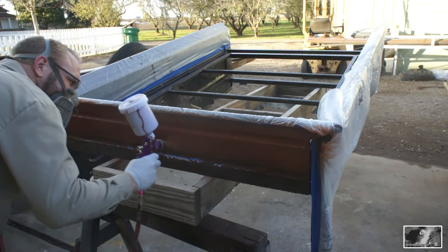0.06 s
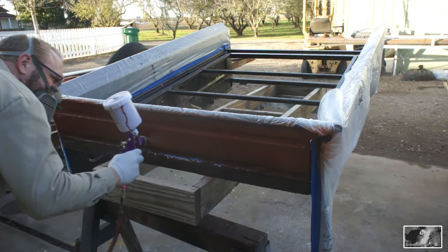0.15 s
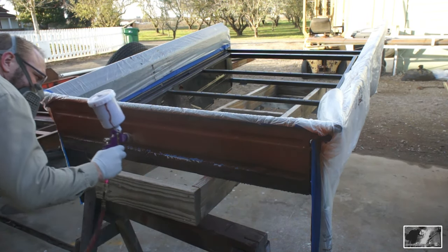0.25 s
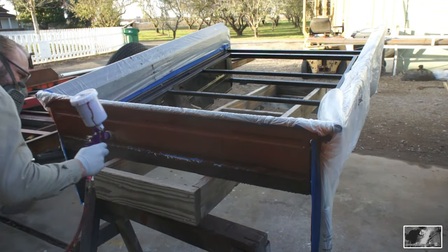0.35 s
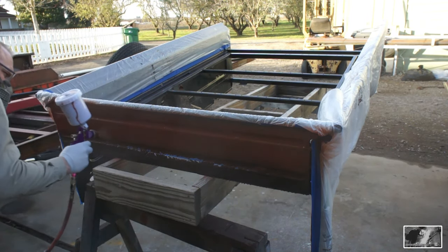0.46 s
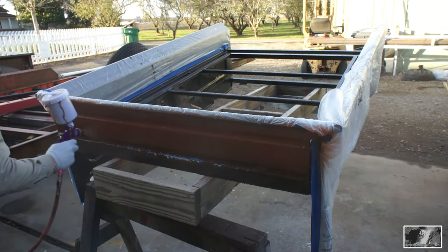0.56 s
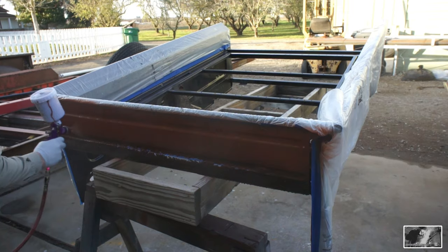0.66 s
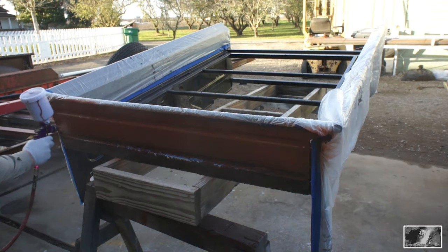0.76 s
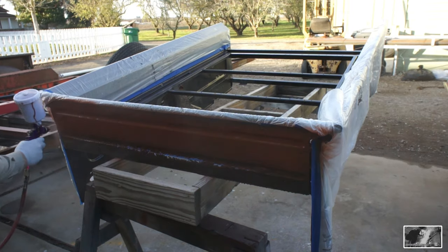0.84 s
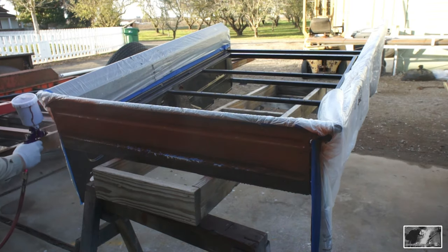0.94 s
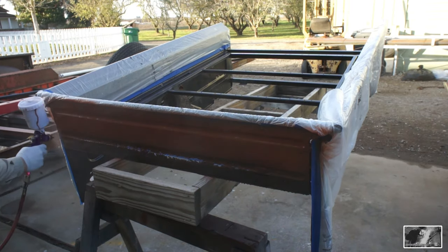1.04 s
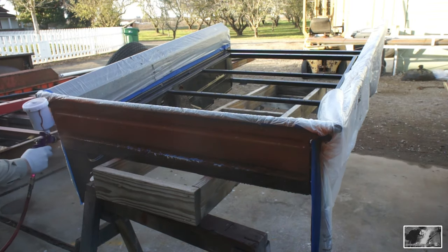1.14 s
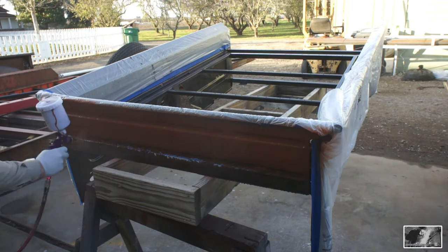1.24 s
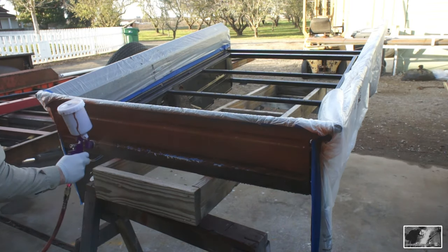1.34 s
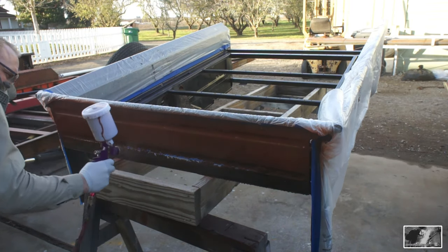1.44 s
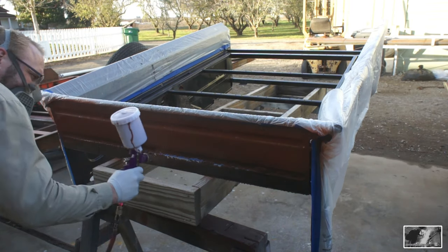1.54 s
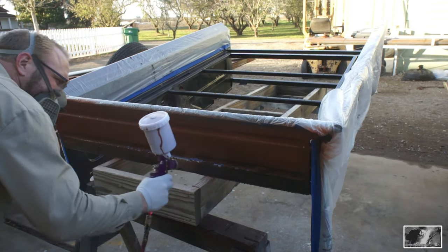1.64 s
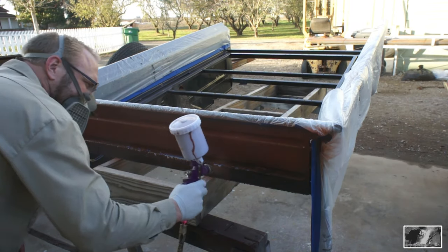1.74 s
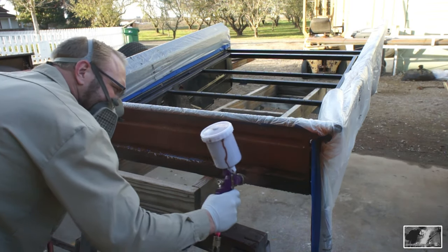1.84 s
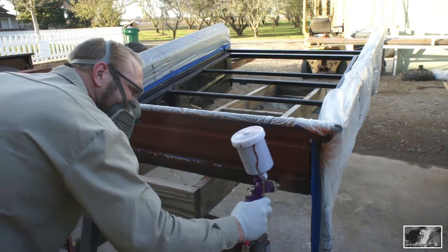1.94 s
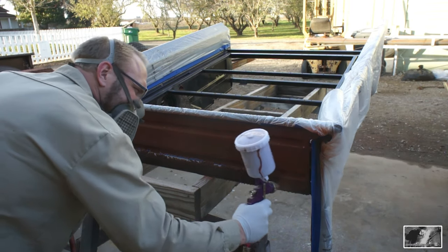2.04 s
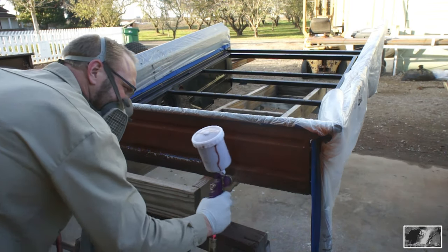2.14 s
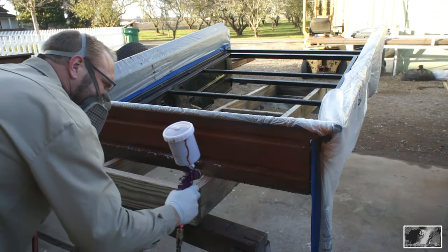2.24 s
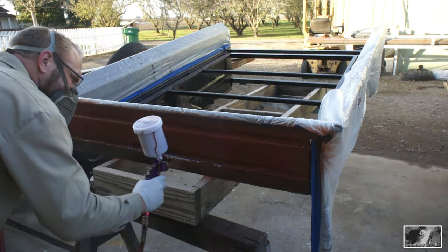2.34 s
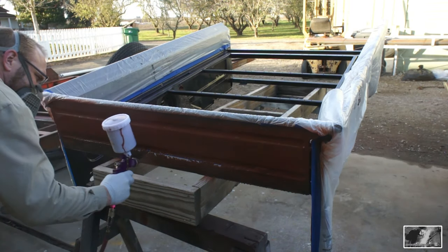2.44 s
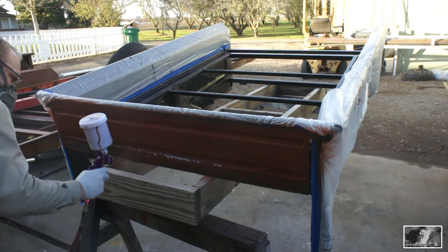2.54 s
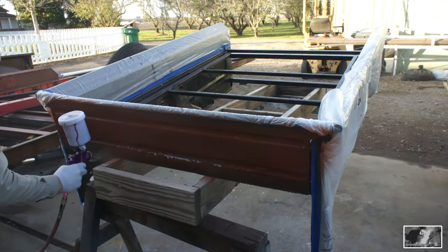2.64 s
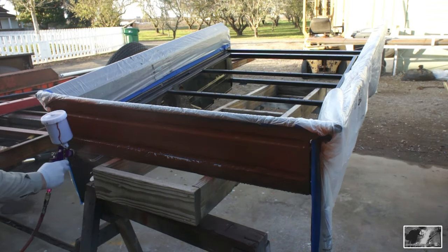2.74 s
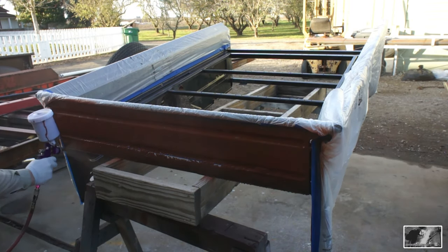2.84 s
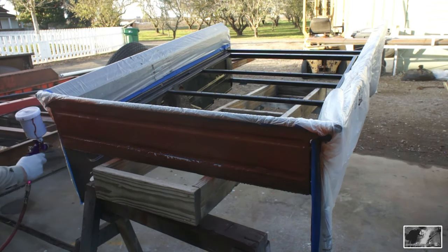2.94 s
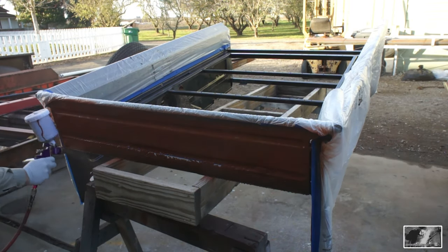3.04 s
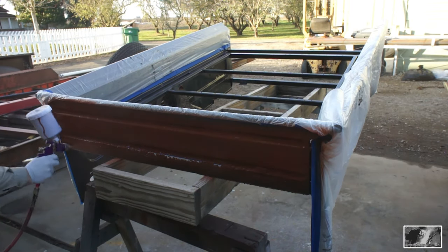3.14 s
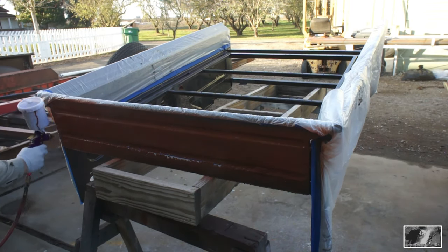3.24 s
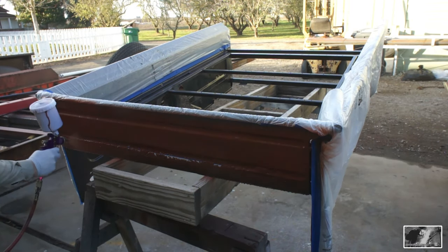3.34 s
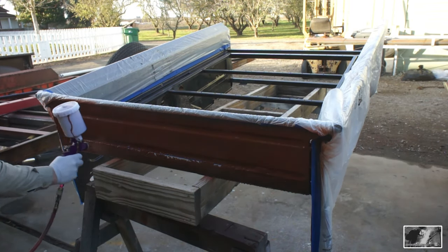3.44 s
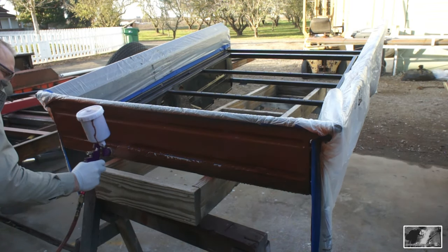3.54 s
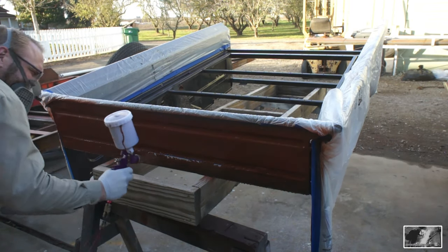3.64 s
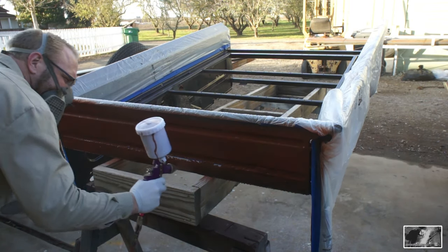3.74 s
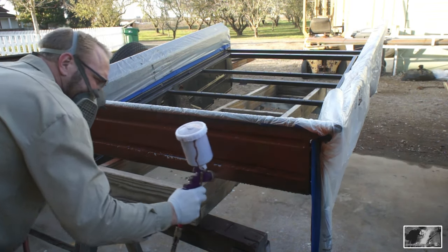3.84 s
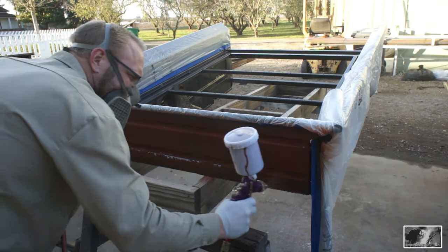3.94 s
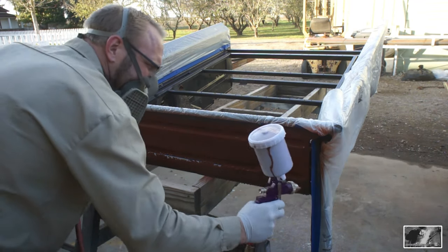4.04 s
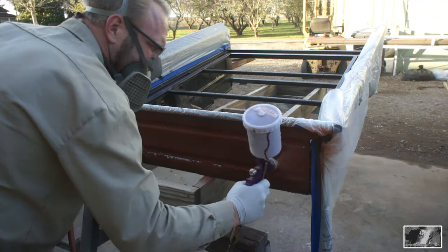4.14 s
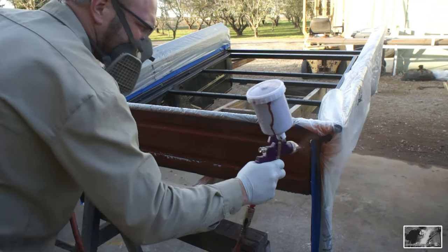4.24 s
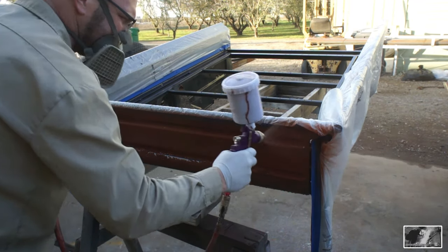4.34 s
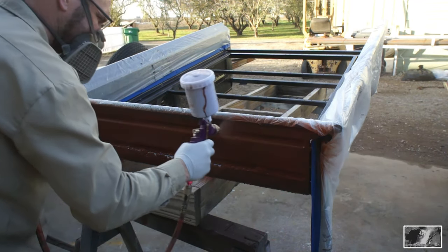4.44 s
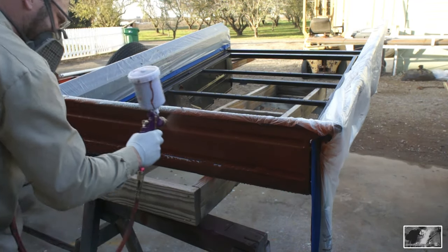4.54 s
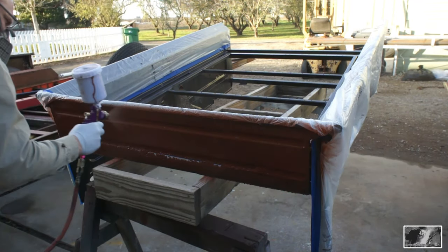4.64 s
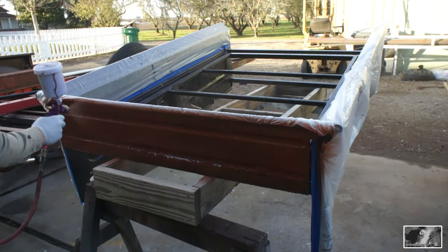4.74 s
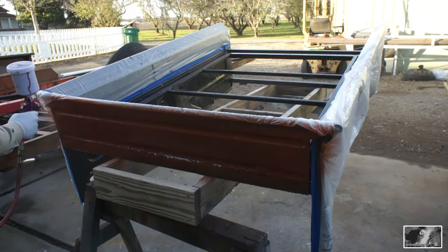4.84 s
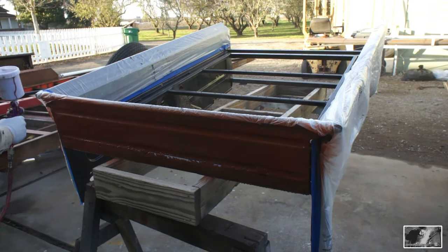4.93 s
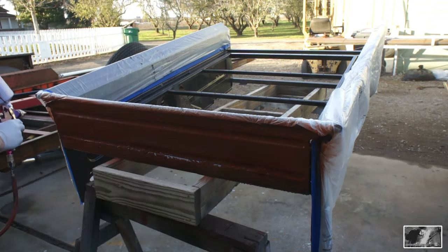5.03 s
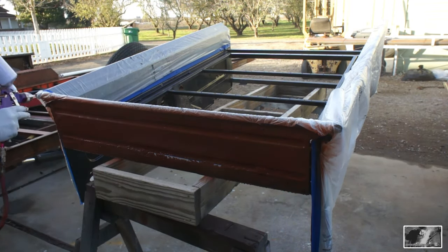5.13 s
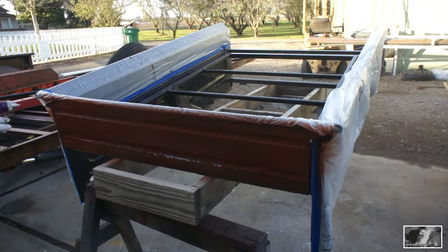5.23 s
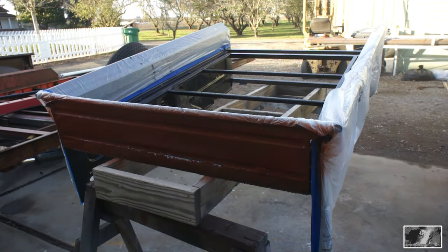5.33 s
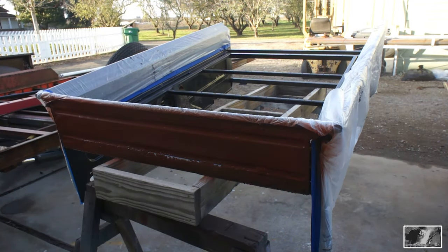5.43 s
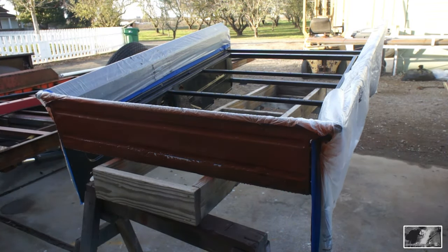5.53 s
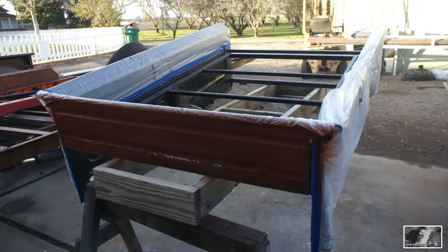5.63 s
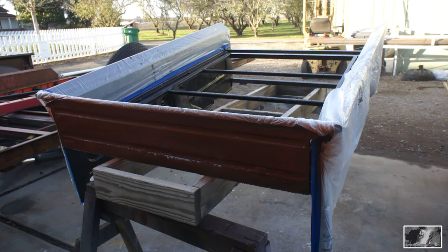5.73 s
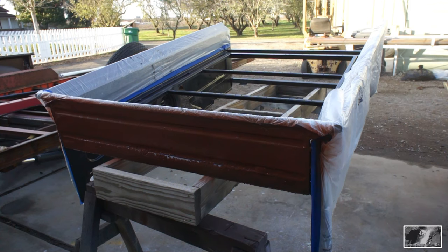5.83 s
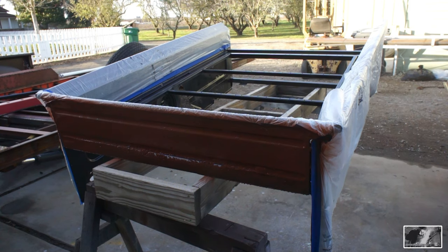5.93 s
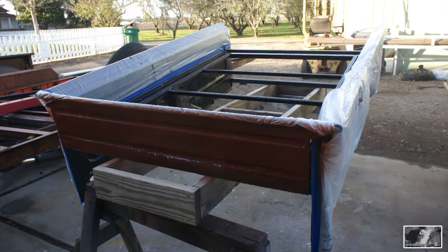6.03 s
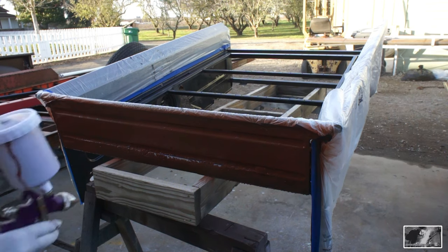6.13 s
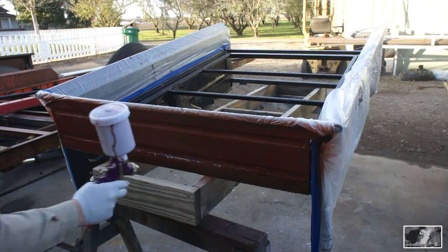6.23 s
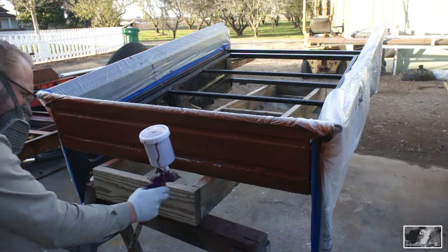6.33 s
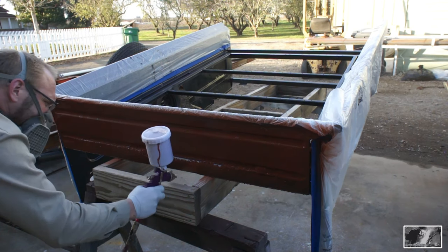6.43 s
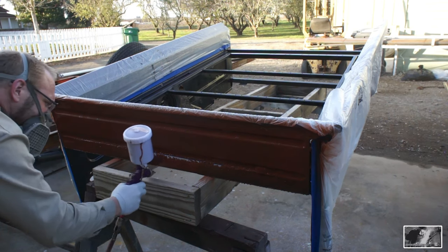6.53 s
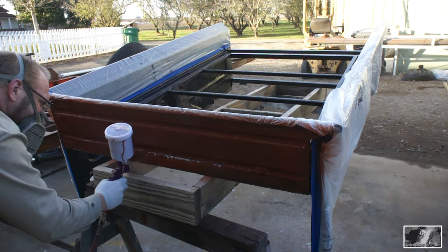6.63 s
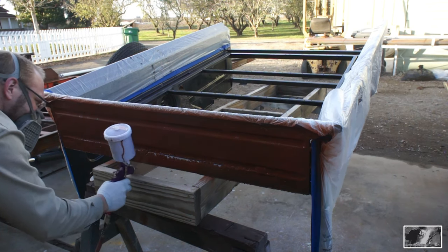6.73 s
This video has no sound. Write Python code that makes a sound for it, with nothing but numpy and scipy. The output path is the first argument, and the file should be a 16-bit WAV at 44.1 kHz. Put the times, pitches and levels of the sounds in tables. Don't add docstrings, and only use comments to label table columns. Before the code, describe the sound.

Outdoors, a spray gun blows close to a metal panel with a full, slightly dull roar. The sound abruptly changes to a brighter, thinner hiss sweeping gently side to side, with a piston compressor chugging rapidly behind. Shoes scrape gritty concrete. The hiss cuts off, leaving the compressor, a small hard clack and cloth rustle, then bursts back. Close stereo microphone.

```python
import sys
import numpy as np
from scipy import signal
from scipy.io import wavfile
from scipy.ndimage import map_coordinates

SR = 44100
rng = np.random.default_rng(int(sys.argv[2]) if len(sys.argv) > 2 else 0)


def natural_amplitude(level_db):
    exponent = np.asarray(level_db, float) / 20
    return 10 ** exponent


def unload_wav(signal):
    wavfile.write(
        sys.argv[1],
        SR,
        np.round(np.clip(np.atleast_2d(signal).T, -1, 1) * 32767).astype(np.int16),
    )


N = 298998
T = np.arange(N) / SR

# open_s, rise_s, shut_s, fall_s
PULLS = [
    (1.1, .01, 5.015, 0.0044),
    (6.372, 0.013, 6.9, .01),
]
# frequency_hz, correlation (-1 to 1)
GUN_LIKENESS = [(60, 0.48), (130, 0.72), (300, 0.98), (700, 0.85), (1500, 0.99), (4000, 0.74), (8000, 0.71),
                (15000, 0.55)]


def rms_one(x):
    return x / np.sqrt(np.mean(x ** 2) + 1e-20)


def in_time(tables):
    s, *columns = np.concatenate(tables).T
    return [np.interp(T, s, c) for c in columns]


def at_hz(points, hz):
    points_hz, values = np.array(points).T
    return np.interp(np.log(hz), np.log(points_hz), values)


def drift(rate, size=N):
    r = np.exp(-80 * np.pi * rate / SR)
    white = rng.standard_normal(N // 40 + 2002)
    slow = signal.lfilter([1], [1, -2 * r, r * r], white)[2000:]
    return np.interp(np.arange(size) / 40, np.arange(len(slow)), rms_one(slow))


def ring(clicks, hz, t60):
    r, w = natural_amplitude(-60 / (t60 * SR)), 2 * np.pi * hz / SR
    return signal.lfilter([0, np.sin(w)], [1, -2 * r * np.cos(w), r * r], clicks + 1e-18)


def shaken(modes):
    out = 0
    for hz, width, db in modes:
        out = out + natural_amplitude(db) * rms_one(ring(rng.standard_normal(N), hz, 2.2 / width))
    return out


def bell(s, width):
    return np.exp(-.5 * ((T - s) / (width / 2)) ** 2)


def humps(rows):
    return sum(natural_amplitude(db) * bell(s, width) for s, width, db in rows)


def octave_bump(hz, centre_hz, octaves):
    return np.exp(-.5 * (np.log2(hz / centre_hz) / octaves) ** 2)


def bands(spectrum, alike, span, patchy_db, grit_db=0, moving=None):
    a, b = (int(np.clip(s * SR, 0, N)) for s in span)
    low, top = spectrum[0][0], min(spectrum[-1][0], .45 * SR)
    per_octave = 5 if top > 15000 else 3
    edges = np.geomspace(low, top, int(per_octave * np.log2(top / low)) + 2)
    grains = natural_amplitude(grit_db * np.minimum(rng.exponential(1, b - a), 5))
    white = rng.standard_normal((2, 2, b - a)) * grains
    out, power, together = np.zeros((2, N)), 0, drift(11.6, size=b - a)
    for k, (lo, hi) in enumerate(zip(edges, edges[1:])):
        band = signal.butter(2, [lo, hi], "band", fs=SR, output="sos")
        mid, side = signal.sosfilt(band, rms_one(white[k % 2]))
        hz = np.sqrt(lo * hi)
        c = np.clip(at_hz(alike, hz), -1, 1)
        power += natural_amplitude(2 * at_hz(spectrum, hz)) * (hi - lo) / (SR / 2)
        db = at_hz(spectrum, hz) + patchy_db * (0.74 * together + drift(27, size=b - a))
        if moving:
            db = db + moving(hz)[a:b]
        gain = np.repeat(natural_amplitude(db[::16]), 16)[:b - a]
        out[:, a:b] += gain * (np.sqrt((1 + c) / 2) * mid + np.sqrt((1 - c) / 2) * side * [[1], [-1]])
    return out if moving else out / np.sqrt(power)


def gun_lead():
    # time_s, lead_us
    sweep = [(0.1, 4), (0.7, 50), (1.1, 52), (1.3, 19.5), (2.1, -17), (2.7, 20), (3.3, 27.5), (4.1, -22),
             (5.0, 34), (5.3, 26), (5.7, 50), (6.3, 36), (6.5, -5), (6.7, 10)]
    return in_time([sweep])[0]


def placed(x, pan_db):
    lead, at, right = gun_lead(), np.flatnonzero(x[1]), np.zeros(N)
    right[at] = map_coordinates(x[1], [at - lead[at] * 1e-6 * SR], order=3, mode="nearest")
    return np.array([x[0], right]) * natural_amplitude(pan_db / 2 * np.array([[1], [-1]]))


def yard():
    # frequency_hz, density_db (per Hz)
    air_colour = [(15, -59), (25, -32), (210, -23.5), (243, -17.5), (275, -12), (383, -13), (471, -18),
                  (522, -10), (579, -10.5), (616, -9.5), (951, -8.5), (1100, -8), (1320, -16), (2090, -10),
                  (3500, -50), (4550, -64), (7700, -120)]
    # frequency_hz, correlation
    air_likeness = [(60, -0.79), (180, -0.027), (550, 0.86), (1650, 0.94), (4970, 0.63), (15000, -0.44)]
    throb, breeze = np.cos(2 * np.pi * (18.13 * T - .04)), drift(4.7)

    def breathing(hz):
        return 0.98 * throb if hz > 900 else 7.1 * breeze * (hz < 220)
    shape = bands(air_colour, air_likeness, (1.1, 7), patchy_db=1.0, moving=breathing)
    return natural_amplitude(-39) * shape / shape[:, 2 * SR:].std()


def compressor():
    turn_hz = 18.13
    # phase (share of a turn), low_db, high_db
    knocks = [
        (.02, -5.5, -3.5),
        (.18, -6, -1),
        (.4, -13.5, -22.5),
        (.7, -2.5, -5),
        (.9, -5.5, -8),
    ]
    # frequency_hz, level_db, t60_s
    housing = [(366, -41, 0.061), (660, -40, .025), (960, -45.5, 0.033), (1416, -41, 0.041),
               (1843, -36.5, 0.046), (2159, -39.5, 0.067), (2580, -53, 0.034)]
    # frequency_hz, width_hz, level_db (rms)
    rattle = [(1117, 25, -48.5), (470, 50, -54.5), (858, 30, -62.5), (1033, 17, -58.5)]
    # multiple, level_db (rms)
    hum = [(21, -59), (28, -55), (29, -54), (30, -54), (35, -58), (38, -58), (43, -56), (46, -54),
           (48, -56), (56, -57), (58, -53), (61, -50), (62, -49), (63, -52)]
    turns = np.arange(int(turn_hz * N / SR) + 1)
    low, high = np.zeros((2, N + SR))
    for share, low_db, high_db in knocks:
        seconds = (turns + share % 1) / turn_hz
        at = (seconds * SR + rng.normal(0, 5, len(turns))).astype(int) % (N + SR)
        low[at] += natural_amplitude(low_db + rng.normal(0, 2.5, len(turns)))
        high[at] += natural_amplitude(high_db + rng.normal(0, 3.5, len(turns)))
    body = shaken(rattle)
    for k, (hz, db, t60) in enumerate(housing):
        clicks = low if hz < 1300 else high
        body += natural_amplitude(db) * ring(clicks[:N], hz, t60) * (-1) ** k
    wall = natural_amplitude(-17) * np.array([np.roll(body, 310), -np.roll(body, 397)])
    out = np.array([body, np.roll(body, 1)]) + wall
    for k, db in hum:
        phase = 2 * np.pi * (round(k) * turn_hz * T + rng.random())
        phase = phase + rng.normal(0, 0.11, (2, 1)) + 0.44 * drift(2.8)
        out += np.sqrt(2) * natural_amplitude(db + 2.8 * drift(5.5)) * np.sin(phase)
    return out


def gusts():
    # time_s, width_s, level_db
    puff_times = [(1.32, 0.026, -41), (1.35, 0.01, -31.5), (1.385, 0.031, -35), (2.03, 0.068, -44.5),
                  (4.09, 0.016, -40), (4.45, 0.041, -44), (4.75, 0.037, -43), (5.87, 0.039, -40)]
    puff_colour = [(120, -11), (200, -1), (400, 2.5), (600, -1), (900, -13)]
    lumps = bands(puff_colour, [(120, -.6), (900, -.6)], (1.2, 6), patchy_db=2.0, grit_db=3.5)
    return humps(puff_times) * lumps


def idle():
    # frequency_hz, density_db (per Hz)
    hiss_colour = [(2000, 1), (2800, 0.5), (3500, -2), (5000, -6.5), (7200, -5), (10500, -8.5), (13300, -9),
                   (15500, -8), (19000, -17)]
    # time_s, width_s, level_db
    rustles = [(5.72, 0.0095, -53), (5.822, 0.0082, -35.5), (5.87, .02, -43), (5.963, 0.016, -37),
               (5.985, 0.015, -42), (6.002, 0.023, -39), (6.022, 0.01, -41)]
    fading = natural_amplitude(-42 - 0.5 * (T - PULLS[0][2]))
    hiss = fading * bands(hiss_colour, [(3000, 0.47), (15000, 0.75)], (4.9, 6.5), patchy_db=1.1)
    cloth_colour = [(2800, -8), (3700, 0.1), (6000, -6), (9000, -7), (16000, -10)]
    cloth = bands(cloth_colour, GUN_LIKENESS, (5.6, 6.1), patchy_db=3.3, grit_db=-2.0)
    return placed(hiss + humps(rustles) * cloth, pan_db=1.5)


def scuffs():
    # start_s, length_s, level_db, swell_db_per_s, hollow_db
    drags = [
        (2.235, 0.28, -31.5, -5, 0.5),
        (3.554, .25, -34.5, 19, 3.5),
    ]
    # time_s, width_s, level_db
    catches = [(2.21, .02, -32.5), (2.266, 0.025, -30), (2.332, 0.023, -28), (2.44, .04, -37),
               (2.48, 0.016, -35), (2.55, .02, -33), (2.98, 0.054, -35), (3.615, 0.014, -34),
               (3.71, 0.044, -37), (3.795, 0.027, -33), (3.851, 0.024, -23.5)]
    # frequency_hz, density_db (per Hz)
    grit_colour = [(290, -29), (500, -20), (566, -20), (635, -13), (993, -13.5), (1410, -4), (1540, -8),
                   (1890, -6.5), (2510, -10.5), (4300, -14), (6200, -19), (13200, -120)]
    attack_s, release_s = .015, 0.022
    level, hollow = humps(catches), np.zeros(N)
    for s, length, db, swell_db, hollow_db in drags:
        shape = np.clip((T - s) / attack_s, 0, 1) * np.exp(-np.maximum(T - s - length, 0) / release_s)
        level = level + shape * natural_amplitude(db + swell_db * np.clip(T - s, 0, length))
        hollow[T > s] = hollow_db
    centred = [(500, 1.0), (6000, 0.94)]
    grit = bands(grit_colour, centred, (2.1, 4), patchy_db=.7, grit_db=1.5,
                 moving=lambda hz: hollow * octave_bump(hz, 1930, .15))
    return level * grit / grit[:, int(2.2 * SR):3 * SR].std()


def clack():
    # start_s, level_db, pitch_hz, t60_s
    struck = [(5.6219, -22, 695, .006), (5.6223, -20, 2400, 0.0056), (5.6225, -22, 4070, 0.0093),
              (5.6235, -29, 9700, .012), (5.6297, -18, 800, 0.0088), (5.6298, -10, 1330, 0.0032),
              (5.630, -19, 5600, 0.0033), (5.638, -25, 1200, .006)]
    cracks = [(5.6228, 0.0022, -27), (5.6255, 0.0052, -34), (5.6305, 0.0038, -33)]
    out = humps(cracks) * rng.standard_normal(N)
    for s, db, hz, t60 in struck:
        out -= natural_amplitude(db) * ring(np.arange(N) == round(s * SR), hz, t60)
    out = signal.sosfilt(signal.butter(2, [420, 11000], "band", fs=SR, output="sos"), out)
    return np.array([out, natural_amplitude(0.5) * np.roll(out, 1)])


def roar():
    # time_s, level_db, boom_db (near 700 Hz)
    drumming = [(0.0, -32.5, -5.5), (0.38, -33.5, -8), (0.5, -33, -10.5), (0.8, -34, -12),
                (0.96, -35, -2.5), (1.17, -33.5, -9.5)]
    # frequency_hz, density_db (per Hz)
    drum_colour = [(24, -49), (40, -23), (155, -9), (184, -7.5), (335, -5.5), (384, -5), (531, -8),
                   (736, -6), (968, -12), (1050, -16), (1360, -12.5), (2090, -15), (2400, -14.5),
                   (3120, -39), (5280, -120)]
    # frequency_hz, width_hz, level_db
    panel = [(190, 46, -46.5), (383.4, 7.5, -45), (730, 50, -48)]
    level, boom = in_time([drumming])
    swing = boom - np.mean(np.array(drumming)[:, 2])
    shape = bands(drum_colour, GUN_LIKENESS, (0, 1.2), patchy_db=.5,
                  moving=lambda hz: swing * np.exp(-np.log(hz / 700) ** 2 / 0.24))
    rings = shaken(panel) * (T < 1.2)
    return placed(natural_amplitude(level) * shape / shape[:, :SR].std() + rings, pan_db=0.5)


def splash():
    # time_s, level_db
    strikes = [
        [(1.17, -41), (1.4, -43), (1.75, -31.5), (1.87, -44), (2.6, -39), (3.5, -48), (4.05, -38), (4.6, -43),
         (5.01, -48)],
        [(6.385, -27.5), (6.48, -30.5), (6.53, -28), (6.57, -32), (6.78, -33.5)],
    ]
    # frequency_hz, density_db (per Hz)
    strike_colour = [(300, -37), (450, -28), (640, -7.5), (800, -13), (1150, -4), (1450, -4), (2000, -5),
                     (2500, -8), (3200, -13.5), (4200, -37)]
    body = -1 + .15 * gun_lead()
    shape = bands(strike_colour, GUN_LIKENESS, (1.1, 7), patchy_db=1.1, grit_db=2.5,
                  moving=lambda hz: body * np.exp(-np.log(hz / 750) ** 2 / 0.15))
    return natural_amplitude(in_time(strikes)[0]) * shape / shape[:, 2 * SR:].std()


def jet(tables, side_on, cap, span, pan_db):
    # time_s, width_s, level_db
    off_edge = [(1.26, 0.14, -3), (2.03, 0.093, -2.5), (3.3, 0.26, -3), (4.1, 0.11, -3), (4.23, .06, -1)]
    jet_band_hz, pivot_hz = 10500, 8000
    beaming = 1.5
    level, facing = in_time(tables)
    missed = sum(db * bell(s, width) for s, width, db in off_edge)

    def colour(hz):
        beam = ((hz / pivot_hz) ** beaming - 1) / (beaming * np.log(2))
        scatter = octave_bump(hz, 8260, 0.5)
        density = level + 10 * np.log10(SR / 2 / jet_band_hz)
        return density + at_hz(side_on, hz) + facing * beam + missed * scatter
    noise = bands(cap, GUN_LIKENESS, span, patchy_db=0.8, grit_db=2.0, moving=colour)
    return placed(noise, pan_db)


def close_jet():
    # time_s, level_db, facing_db_per_octave
    close_flow = [(0.0, -26.5, 0), (0.25, -25, 2.5), (0.45, -26, 2), (0.65, -27, 1), (1.17, -29.5, -1.5)]
    # frequency_hz, level_db
    close_side_on = [(3500, -3.5), (6300, 0.5), (9300, 2), (12100, -5.5)]
    # frequency_hz, density_db (per Hz)
    close_cap = [(1000, 1.5), (2000, 0.8), (4000, 3.5), (6000, 1.2), (8000, 1.7), (10000, 4.5), (11800, 7),
                 (13000, -8), (14500, -15), (17000, -14)]
    return jet([close_flow], close_side_on, close_cap, (0, 1.2), pan_db=3.5)


def swept_jet():
    # time_s, level_db, facing_db_per_octave
    flow = [(1.17, -33, 0.5), (1.46, -33, 1), (1.76, -32, 1.5), (2.42, -33.5, 0), (2.65, -33, 0),
            (3.15, -33.5, 1), (3.5, -33, 0), (3.85, -32.5, 0.5), (4.56, -34.5, 0), (4.85, -36, -1),
            (5.01, -41, 2)]
    flow_again = [
        (6.385, -26.5, 0.54),
        (6.44, -28.5, 4.2),
        (6.5, -30, 2.2),
        (6.6, -31, 0.83),
        (6.78, -32, 1.1),
    ]
    # frequency_hz, level_db
    swept_side_on = [(3570, 1), (6040, -3), (8700, 0.5), (12900, -1)]
    # frequency_hz, density_db (per Hz)
    swept_cap = [(1000, -34), (2000, -2), (4000, 2), (7000, 4.5), (9000, 1.6), (11500, 3.5), (13500, 4.5),
                 (15500, 3.5), (19000, -5)]
    pan_db = .5 + 0.0642 * gun_lead()
    return jet([flow, flow_again], swept_side_on, swept_cap, (1.1, 7), pan_db)


def trigger():
    flow = 0
    for on, rise, off, fall in PULLS:
        flow = flow + np.clip((T - on) / rise, 0, 1) * np.exp(-np.maximum(T - off, 0) / fall)
    return flow


def starved(x):
    # start_s, end_s
    scraps = [(.02, .125), (.18, .24), (.32, .36), (.48, .52), (.55, .59), (.62, .655), (.67, .77),
              (.74, .89)]
    hz, s, frames = signal.stft(x, SR, nperseg=1024)
    ragged = np.repeat(rng.normal(0, 170, len(s)), 3)[:len(s)]
    edge = np.interp(s, [0, 1.2], [13050, 12350]) + ragged
    keep = 1. * (hz[:, None] < edge)
    for start, end in scraps:
        up, down = 450 * rng.random(2)
        low, high = 13700 + up, 15350 - down
        keep[np.ix_((hz > low) & (hz < high), (s > start + .012) & (s < end - .012))] = 1
    return signal.istft(frames * keep, SR, nperseg=1024)[1][:, :x.shape[1]]


def scene():
    change_s, fade_s = 1.15, 0.038
    first = close_jet() + roar()
    first[:, :2 * SR] = starved(first[:, :2 * SR])
    gun = trigger() * (swept_jet() + splash())
    second = yard() + compressor() + gusts() + idle() + scuffs() + clack() + gun
    over = np.clip((T - change_s) / fade_s + .5, 0, 1)
    return first * np.sqrt(1 - over ** 4) + second * over ** 2


def top_cut(x):
    return signal.sosfilt(signal.butter(12, 16920, fs=SR, output="sos"), x)


def record(dry):
    cut = signal.sosfilt(signal.ellip(16, .5, 90, 15790, fs=SR, output="sos"), dry)
    return top_cut(cut)


dry = scene()
out = record(dry)
unload_wav(out)
```